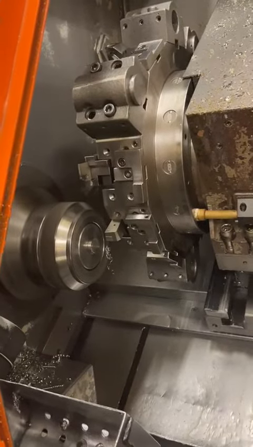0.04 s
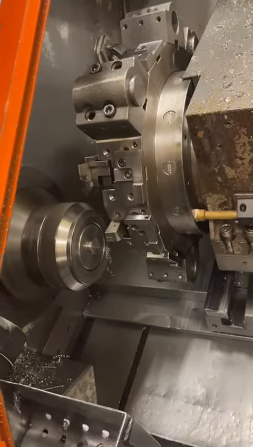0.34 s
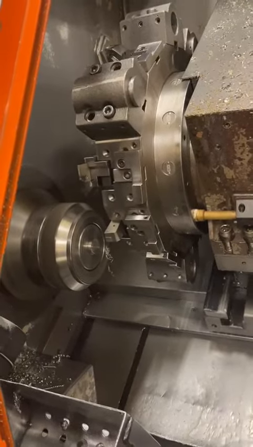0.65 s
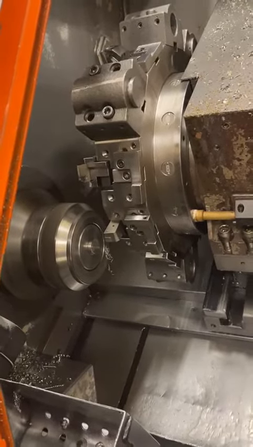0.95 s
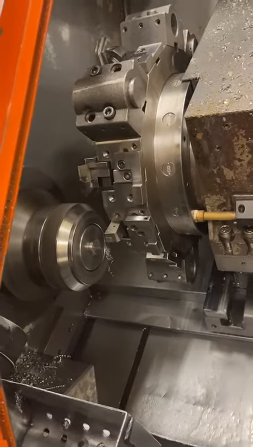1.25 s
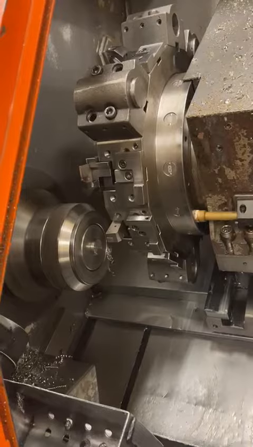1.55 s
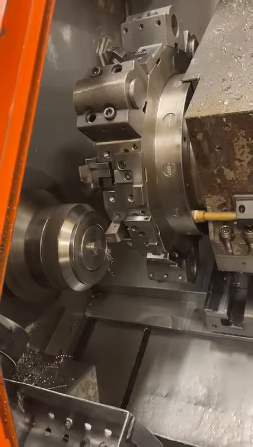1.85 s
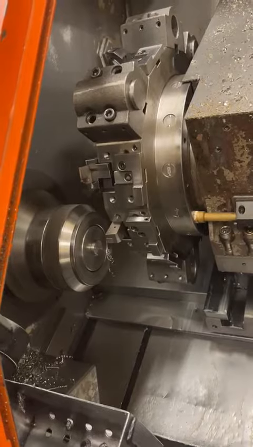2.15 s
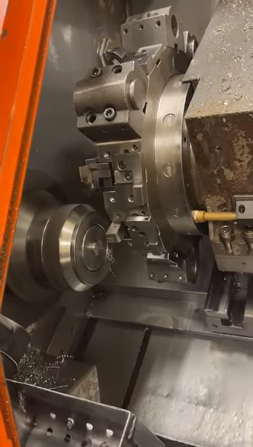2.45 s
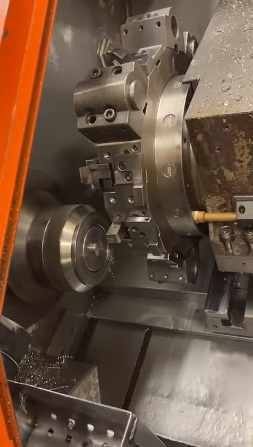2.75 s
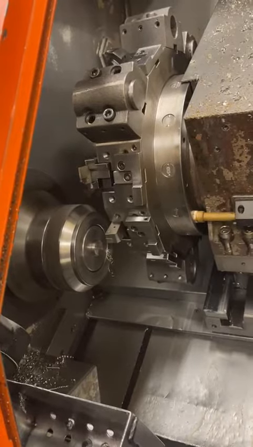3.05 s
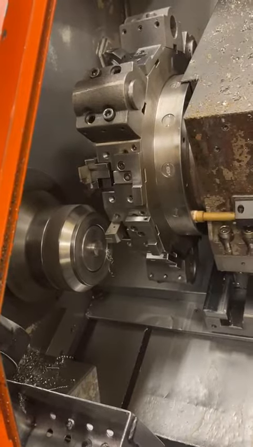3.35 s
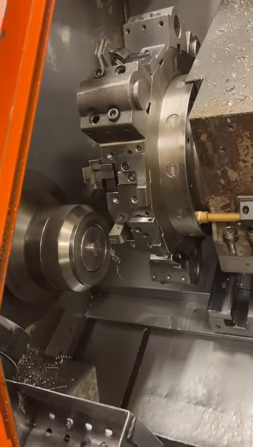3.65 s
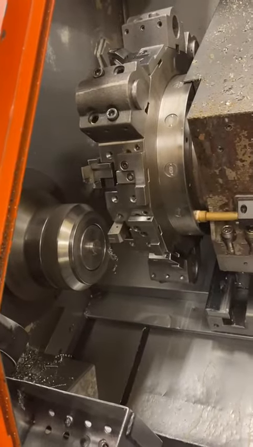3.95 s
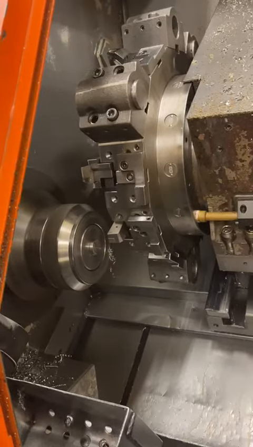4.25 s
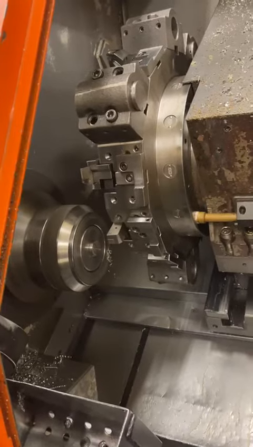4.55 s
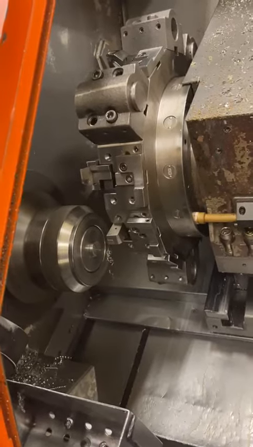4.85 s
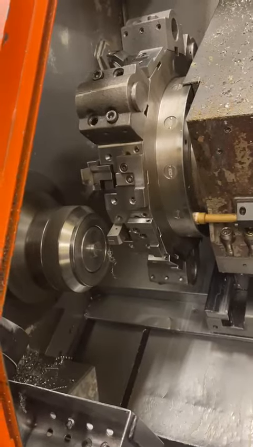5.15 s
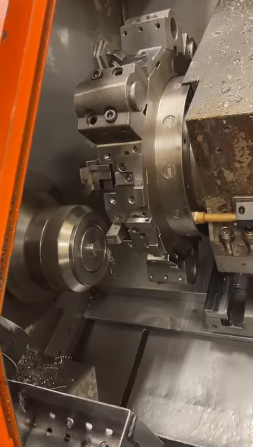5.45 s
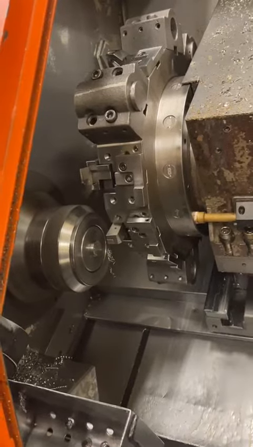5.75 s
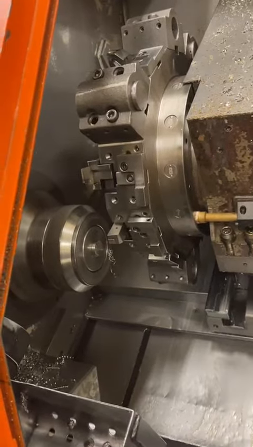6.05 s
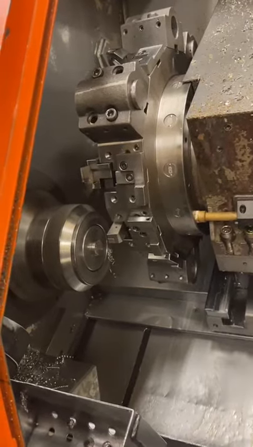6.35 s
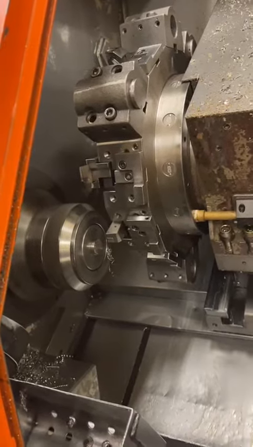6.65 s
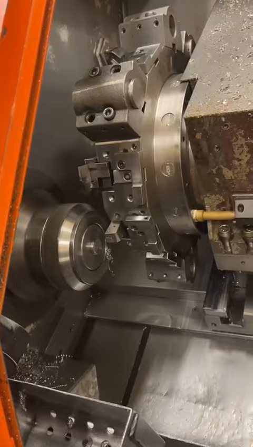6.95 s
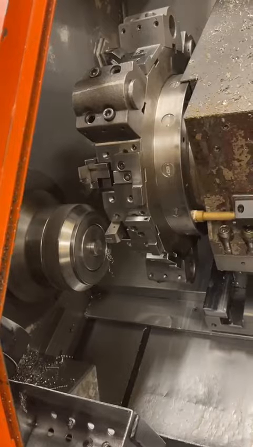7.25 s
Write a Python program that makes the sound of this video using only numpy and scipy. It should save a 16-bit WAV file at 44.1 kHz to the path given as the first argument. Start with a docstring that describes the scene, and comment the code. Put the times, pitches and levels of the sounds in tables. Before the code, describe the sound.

Heard from close to its enclosure, a lathe cuts steel: dry shearing, fine sizzling and small scrapes sit over a constant spindle whine, hum, rumble and airy hiss. The tool gives a single short ringing squeal, and the slide knocks softly. After a few brighter scrapes the tool withdraws, leaving the spindle droning and the coolant hissing, with one last dull clunk.

```python
"""A spindle bearing drones and whines, throbbing once a turn, as a CNC lathe cuts a small steel part.
Pump hum, fluttering machine tones, cabinet rumble and a hiss of air and coolant run throughout.
The edge shears with a dry hiss; the chip sizzles, rubs and rasps until the tool withdraws at 4.5-4.8 s.
Friction sets off one squeal near 2.8 s. The turret slide clunks softly near 3.5 s and at 7.1 s."""
import sys
import numpy as np
from scipy import signal
from scipy.fft import rfft, irfft, next_fast_len
from scipy.io import wavfile

SR = 44100
rng = np.random.default_rng(int(sys.argv[2]) if len(sys.argv) > 2 else 0)


def pcm_store(signal):
    """Save signal as 16-bit PCM."""
    levels = np.round(np.clip(np.atleast_2d(signal), -1, 1) * 32767)
    wavfile.write(sys.argv[1], SR, levels.astype(np.int16).T)


N = 331191

# stereo image by frequency: f/Hz, left-right likeness/0-1, left lead/rad
STEREO_IMAGE = [(240, 1, 0), (320, .96, .3), (430, .85, .1), (620, .55, 1.25), (900, .4, 1.4),
                (1400, .2, 0), (1780, .88, 0), (2300, .35, .3), (3000, .35, 2.1), (3900, .2, .7),
                (4400, .35, 2.3), (4800, .97, 3.1), (5200, .55, 4.6), (5600, .99, 6.2), (6600, .99, 6.33),
                (7300, .65, 7.7), (8300, .999, 9.4), (9700, .999, 9.45), (10700, .72, 10.9),
                (11400, .92, 12.5)]
# bearing drone and whine: ball-pass multiple, sideband/spindle rates, level/dB, left-right/dB
BEARING_PARTIALS = [(1, -2, -53.0, 0), (0, 3, -47.8, 0), (1, -1, -46.5, 0), (1, 0, -48.0, 0),
                    (1, 1, -49.0, 0), (1, 2, -45.6, 0), (2, -2, -50.3, 0), (1, 3, -48.3, 0),
                    (2, -1, -50.6, 0), (2, 0, -42.3, 0), (2, 1, -48.6, 0), (3, -3, -54.0, 0),
                    (2, 2, -53.4, 0), (3, -2, -41.4, 0), (3, -1, -36.3, -1), (3, 0, -32.6, 0),
                    (3, 1, -36.1, -2), (4, -3, -50.8, 1), (3, 2, -46.7, 0), (4, -2, -45.4, 0),
                    (3, 3, -46.5, 0), (4, -1, -48.8, -1), (4, 0, -56.1, -2), (4, 1, -52.2, 1),
                    (4, 2, -60.8, 12), (5, -1, -61.4, 1), (5, 0, -61.0, 3), (5, 1, -57.6, 0),
                    (6, -2, -52.2, 5), (5, 3, -55.5, 4), (6, -1, -39.6, 3), (6, 0, -47.0, -5),
                    (7, 0, -57.2, 6), (7, 1, -51.8, 1), (7, 2, -59.8, 12), (8, -1, -59.5, 4),
                    (8, 0, -55.0, 0), (8, 1, -60.5, 12), (10, 1, -59.5, -3), (12, 0, -58.4, 5),
                    (16, 1, -61.1, 6), (16, 2, -54.1, 2), (17, -2, -53.4, -5), (16, 3, -48.5, -5),
                    (17, -1, -42.5, -1), (17, 0, -59.7, -2), (17, 2, -61.8, -2), (21, -1, -57.7, -4),
                    (21, 1, -59.0, -4), (22, 1, -58.8, 2)]
# housing's delay and smear of the throb: f/Hz, crest t/s, smear/rad
HOUSING_THROB = [(105, .006, .1), (210, .009, .8), (315, .029, .63), (630, .04, 1.2), (1786, .042, -.3)]
# mid-pitched machine tones, including one bearing sideband: f/Hz, level/dB, left-right/dB
MACHINE_TONES = [(550.3, -58.7, -2), (598.6, -60.3, 5), (615.3, -59.2, -12), (617.0, -60.4, 5),
                 (633.6, -51.6, -2), (638.1, -60.4, 3), (645.3, -46.7, 5), (651.8, -47.2, -5),
                 (698.4, -60.5, 1), (968.0, -59.6, 8), (1521.0, -57.9, 6), (1750.8, -58.6, -9),
                 (1756.4, -59.6, 0), (1768.1, -58.8, -1), (1777.8, -56.3, 0)]
# rush of bearings and fans: f/Hz, relative density/dB
RUSH_SPECTRUM = [(150, -13.5), (300, -5), (420, -7.5), (630, -8.5), (880, -12.5), (1150, -13.5),
                 (1450, -17), (2300, -17.5), (4000, -18.5), (7000, -52)]
# hydraulic pump and motor hum: f/Hz, level/dB, left-right/dB
PUMP_TONES = [(56.8, -49.6, 0), (58.9, -52.7, 0), (66.1, -47.7, 0), (66.7, -43.7, 0), (99.8, -48.0, 0),
              (116.7, -41.2, 0), (133.4, -42.6, 0), (156.0, -52.3, 0), (183.4, -51.6, 0), (196.9, -48.4, 0),
              (199.5, -46.5, 0), (230.1, -51.8, 0), (234.4, -46.1, 0), (322.7, -50.2, -3),
              (434.6, -48.4, -2)]
# panel rumble: f/Hz, relative density/dB
RUMBLE_SPECTRUM = [(20, -26), (38, -23), (56, -0.5), (76, -6), (120, -0.5), (180, -4), (270, -4.5)]
# swell of hum and rumble: t/s, gain/dB
CABINET_SWELL = [(0, -1), (1.8, 0), (2.4, 0), (4.1, 0.5), (4.7, -2), (5.2, 2), (6.9, 0), (7.15, 2.5),
                 (7.5, 2)]
# air and coolant: f/Hz, relative density/dB
HISS_SPECTRUM = [(1500, -25), (3200, -9.5), (4400, -6.5), (5000, -3), (6000, -1), (7200, .7), (8600, 2),
                 (9800, 3.8), (10800, 5), (11600, -2)]
# whistles in the hiss: f/Hz, width/Hz, level/dB
AIR_WHISTLES = [(2260, 330, -47), (5040, 180, -49), (6050, 220, -51), (7230, 130, -47), (7980, 140, -49),
                (8800, 100, -50)]
# shearing at the edge: f/Hz, relative density/dB
SHEAR_SPECTRUM = [(600, -29), (1400, -8.5), (2200, 0.5), (2800, -1), (4000, -5.5), (5000, -3), (6500, -0.5),
                  (10000, -39)]
# tool load, heard as shearing: t/s, level/dB
TOOL_LOAD = [(0, -31), (.45, -35.5), (.62, -37.5), (.87, -35), (1.15, -43), (1.4, -37.5), (1.9, -40),
             (2.1, -36.5), (2.68, -38.5), (2.85, -31), (3.1, -34.5), (3.5, -33.5), (3.75, -36.5),
             (4.0, -36.5), (4.56, -34)]
# chip sizzle: f/Hz, relative density/dB
SIZZLE_SPECTRUM = [(3500, -26), (6000, -17), (8000, -3), (9300, 0), (10900, .7), (11600, -7)]
# chip flicks that flare the sizzle: t/s, level/dB
CHIP_FLICKS = [(.13, -37), (.3, -34), (.58, -33), (.88, -30), (1.17, -42), (2.02, -35), (2.23, -27),
               (2.47, -27), (2.85, -32), (3.18, -34), (3.57, -27), (3.68, -31), (3.79, -26), (4.05, -40),
               (4.4, -32)]
# chip catching on the tool: t/s, level/dB, rise/s, decay/s
CHIP_RUBS = [(.07, -42, .05, .11), (.39, -33.5, .04, .05), (.86, -39, .04, .05), (2.22, -39, .03, .036),
             (3.17, -31, .04, .045), (4.025, -24.5, 0.041, 0.1), (4.352, -26.5, .026, 0.061)]
# tool tip rings: f/Hz, width/Hz, level re rub/dB
TIP_RINGS = [(6080, 60, -6), (6400, 50, -18.5)]
# chip dragging over the holder: t/s, level/dB
CHIP_DRAGS = [(.14, -37), (.29, -39), (.44, -32.5), (3.2, -39), (4.13, -36), (4.29, -36.5), (4.53, -38.5)]
# holder modes stirred by the squeal: crest t/s, f/Hz, width/Hz, level/dB, decay/s
HOLDER_MODES = [(2.762, 1630, 58, -30, .035), (2.885, 2220, 30, -31, 0.065), (3.4, 2250, 340, -40, .12),
                (2.798, 4560, 320, -31, 0.059), (2.794, 5020, 260, -29, 0.08)]
# turret slide knocks: t/s, level before attack/dB, f/Hz, t60/s
SLIDE_CLUNKS = [(3.455, -19, 117, 0.4), (3.48, -18.5, 133, 0.27), (3.48, -23, 93, 0.41),
                (3.6, -18, 58, 0.27), (3.69, -27.5, 113.5, 0.38), (7.121, -24, 62, 0.6)]

SPINDLE_HZ, BALL_PASS_HZ, MOTOR_HZ = 21.39, 105.043, 19.46
CUT_END_S, RETRACT_S = 4.78, 0.26
TIME_S = np.arange(N) / SR


def from_db(db):
    return 10 ** (np.asarray(db) / 20)


def unit_rms(x):
    return x / np.sqrt(np.mean(x ** 2) + 1e-20)


def at_hz(table, hz, column=1):
    """Table column on a log-frequency axis."""
    table = np.array(table)
    return np.interp(np.log(hz + 1e-9), np.log(table[:, 0]), table[:, column])


def cycle(hz, crest_s):
    return np.cos(2 * np.pi * hz * (TIME_S - crest_s))


def swell(crest_s, rise_s, decay_s):
    """Linear rise to 1, exponential decay."""
    age_s = TIME_S - crest_s
    return np.clip(1 + age_s / rise_s, 0, 1) * np.exp(-np.maximum(age_s, 0) / decay_s)


def drift(rate_hz):
    """Twice low-passed noise, rms 1."""
    hop, settle = 100, 2000
    pole = np.exp(-2 * np.pi * hop * rate_hz / SR)
    white = rng.standard_normal(N // hop + settle + 2)
    slow = signal.lfilter([1], [1, -2 * pole, pole * pole], white)[settle:]
    return np.interp(np.arange(N) / hop, np.arange(len(slow)), unit_rms(slow))


def noise(gain_at):
    """Shaped stereo noise, rms 1."""
    size = next_fast_len(N, True)
    hz = np.fft.rfftfreq(size, 1 / SR)
    left, other = rfft(rng.standard_normal((2, size)))
    likeness = np.clip(at_hz(STEREO_IMAGE, hz), 0, 1)
    right = likeness * left + np.sqrt(1 - likeness ** 2) * other
    right *= np.exp(-1j * at_hz(STEREO_IMAGE, hz, column=2))
    return unit_rms(irfft(np.array([left, right]) * gain_at(hz), size)[:, :N])


def coloured(spectrum):
    """Noise on a spectrum, rolled off past its last point."""
    top_hz = 1.05 * spectrum[-1][0]
    return noise(lambda hz: from_db(at_hz(spectrum, hz)) / np.sqrt(1 + (hz / top_hz) ** 40))


def resonance(centre_hz, width_hz):
    """Steep-sided noise band."""
    return noise(lambda hz: 1 / np.sqrt(1 + (2 * (hz - centre_hz) / width_hz) ** 4))


def partial(hz, level_db, pan_db, clock_s, phase_rad):
    """One stereo tone."""
    lag_rad = np.array([[0], [at_hz(STEREO_IMAGE, hz, column=2)]])
    gains = np.sqrt(2) * from_db([[level_db + pan_db / 2], [level_db - pan_db / 2]])
    return gains * np.sin(2 * np.pi * hz * clock_s + phase_rad - lag_rad)


def bearing(drone_gain, drone_top_hz=700, wow_s=2e-5, jitter_s=7e-6, flutter=0.082):
    """Balls roll over a worn spot that enters the loaded zone once a turn: throbbing harmonics."""
    clock_s = TIME_S + wow_s * drift(0.81) + jitter_s * drift(5.5)
    multiples = sorted({row[0] for row in BEARING_PARTIALS})
    wavers = {multiple: 1 + flutter * drift(15) for multiple in multiples}
    out = 0
    for multiple, sideband, db, pan_db in BEARING_PARTIALS:
        centre_hz, shift_hz = multiple * BALL_PASS_HZ, sideband * SPINDLE_HZ
        smear_rad = at_hz(HOUSING_THROB, centre_hz, column=2) * sideband ** 2
        delay_rad = 2 * np.pi * shift_hz * at_hz(HOUSING_THROB, centre_hz)
        tone = partial(centre_hz + shift_hz, db, pan_db, clock_s, smear_rad - delay_rad)
        gain = drone_gain if centre_hz < drone_top_hz else 1
        out += gain * wavers[multiple] * tone
    return out


def spindle(beat_db=1.3, beat_period_s=0.525, motor_depth=0.13):
    """The drone beats slowly and throbs with the drive motor; drone and whine grow once unloaded."""
    unload_db = np.interp(TIME_S, [CUT_END_S, CUT_END_S + 1], [-0.4, 0.9])
    beat = from_db(beat_db * cycle(1 / beat_period_s, crest_s=4.11))
    motor_throb = 1 + motor_depth * cycle(MOTOR_HZ, crest_s=0.032)
    return from_db(unload_db) * bearing(beat * motor_throb)


def shaft_tones(table, gain_db, wow_s, flutter):
    """Shaft angle wanders; each tone also wavers in level."""
    clock_s = TIME_S + wow_s * drift(0.94)
    out = 0
    for hz, db, pan_db in table:
        waver = 1 + flutter * drift(5.8)
        out += waver * partial(hz, db + gain_db, pan_db, clock_s, rng.uniform(0, 2 * np.pi))
    return out


def machine_tones():
    """Fluttering mid-pitched tones of the running machine."""
    return shaft_tones(MACHINE_TONES, gain_db=1.65, wow_s=5e-5, flutter=0.32)


def bearing_rasp(level_db=-49, depth=0.36):
    """Rough rolling contact rings just under the whine, throbbing once a turn."""
    throb = 1 + depth * cycle(SPINDLE_HZ, crest_s=HOUSING_THROB[-1][1])
    return from_db(level_db) * throb * resonance(centre_hz=1720, width_hz=136)


def rush(level_db=-34, waver_db=1):
    """Broad noise of bearings and fans."""
    return from_db(level_db + waver_db * drift(18)) * coloured(RUSH_SPECTRUM)


def cabinet(rumble_db=-35, waver_db=1):
    """Panels rumble and pass on the pump's hum; both swell together."""
    pump = shaft_tones(PUMP_TONES, gain_db=0.3, wow_s=2.5e-4, flutter=0.085)
    rumble = from_db(rumble_db - waver_db * drift(18)) * coloured(RUMBLE_SPECTRUM)
    swell_db = np.interp(TIME_S, *np.transpose(CABINET_SWELL))
    return from_db(swell_db) * (pump + rumble)


def enclosure(x, wall_db, count=10):
    """Short sheet-metal echoes ripple the spectrum; rms 1."""
    lags = (rng.uniform(0.0016, 0.014, count) * SR).astype(int)
    echoes = sum(rng.choice([-1, 1]) * np.roll(x, lag, axis=1) for lag in lags)
    return unit_rms(x + from_db(wall_db) * echoes)


def air(hiss_db=-30.5, waver_db=1.1):
    """Air and coolant hiss, with faint whistles."""
    hiss = from_db(hiss_db + waver_db * drift(24)) * enclosure(coloured(HISS_SPECTRUM), wall_db=-14)
    return hiss + sum(from_db(db) * resonance(hz, width_hz) for hz, width_hz, db in AIR_WHISTLES)


def grit(rate_per_s=70, spread_db=3.5, decay_s=0.002):
    """Crumbs snap off the chip at random, each a tiny scratch; rms 1."""
    snaps = rng.random(N) < rate_per_s / SR
    strengths = from_db(spread_db * np.minimum(rng.exponential(1, N), 3))
    envelope = signal.lfilter([1], [1, -np.exp(-1 / (decay_s * SR))], snaps * strengths + 1e-18)
    return unit_rms(envelope * resonance(centre_hz=4100, width_hz=3000))


def shearing(waver_db=0.85, grit_db=-8.5):
    """The edge shears steel: dry hiss and grit follow the load."""
    level_db = np.interp(TIME_S, *np.transpose(TOOL_LOAD)) + waver_db * drift(22)
    hiss = enclosure(coloured(SHEAR_SPECTRUM), wall_db=-5)
    return from_db(level_db) * (hiss + from_db(grit_db) * grit())


def cutting(sizzle_db=-33.7, flicker_db=2, slip_db=2):
    """Shearing plus the sizzle of a chip curling off in tiny jerks, until the tool withdraws."""
    engaged = np.clip((CUT_END_S - TIME_S) / RETRACT_S, 0, 1)
    slips = from_db(slip_db * drift(37))
    edge = shearing()
    curl = from_db(sizzle_db + flicker_db * drift(17))
    flares = sum(from_db(db) * swell(at_s, rise_s=0.05, decay_s=0.04) for at_s, db in CHIP_FLICKS)
    chip = np.hypot(curl, flares) * slips * coloured(SIZZLE_SPECTRUM)
    return engaged * (edge + chip)


def rubs():
    """The chip catches, exciting a bright tool resonance and thin tip rings."""
    envelope = sum(from_db(db) * swell(at_s, rise_s, decay_s) for at_s, db, rise_s, decay_s in CHIP_RUBS)
    tool = resonance(centre_hz=6420, width_hz=2600)
    tip = sum(from_db(db) * resonance(hz, width_hz) for hz, width_hz, db in TIP_RINGS)
    return envelope * (tool + tip)


def drags():
    """The chip drags over the holder: a lower rasp."""
    envelope = sum(from_db(db) * swell(at_s, rise_s=0.073, decay_s=0.078) for at_s, db in CHIP_DRAGS)
    return envelope * resonance(centre_hz=2090, width_hz=550)


def squeal(crest_s=2.79, rise_s=0.059, pitch_hz=1685, flat_hz=65, waver_hz=32, tone_db=-26, tail_db=-28.6):
    """Friction drives a tool mode up to pitch; it rattles out as the tool bounces on the work."""
    onset = np.clip(1 + (TIME_S - crest_s) / rise_s, 0, 1)
    glide_hz = pitch_hz - flat_hz * (1 - onset) + waver_hz * drift(54)
    phase_rad = 2 * np.pi * np.cumsum(glide_hz) / SR
    tone = from_db(tone_db) * swell(crest_s, rise_s, decay_s=0.045) * np.sin(phase_rad)
    rattle = 1 + 0.65 * cycle(hz=23, crest_s=2.908)
    tail = from_db(tail_db) * swell(crest_s, rise_s, decay_s=0.19) * resonance(pitch_hz, width_hz=85)
    return tone + rattle * tail


def holder_ring(rise_s=0.034):
    """Holder modes ring with and after the squeal."""
    return sum(from_db(db) * swell(at_s, rise_s, decay_s) * resonance(hz, width_hz)
               for at_s, hz, width_hz, db, decay_s in HOLDER_MODES)


def clunks(contact_s=0.0063):
    """The heavy slide softly knocks low modes of the machine bed."""
    out = 0
    for at_s, db, hz, t60_s in SLIDE_CLUNKS:
        age_s = np.maximum(TIME_S - at_s, 0)
        attack = 1 - np.exp(-age_s / contact_s)
        out += from_db(db - 60 * age_s / t60_s) * attack * np.sin(2 * np.pi * hz * age_s)
    return out


def scene():
    """Running machine, cut and slide."""
    running = spindle() + machine_tones() + bearing_rasp() + rush()
    cut = cutting() + rubs() + drags() + squeal() + holder_ring()
    return running + cabinet() + air() + cut + clunks()


def record(dry):
    """Steep low-pass."""
    cutoff_hz = 11600
    return signal.sosfilt(signal.ellip(12, 0.1, 90, cutoff_hz, fs=SR, output="sos"), dry)


dry = scene()
out = record(dry)
pcm_store(out)
```